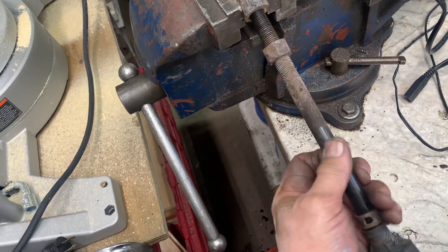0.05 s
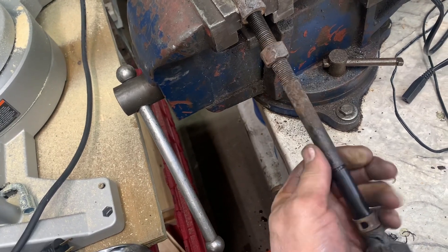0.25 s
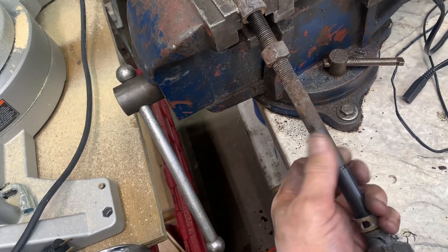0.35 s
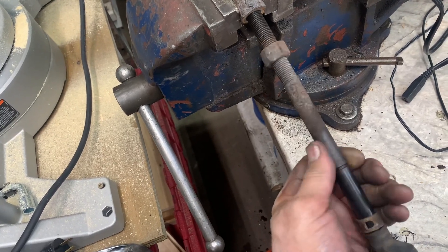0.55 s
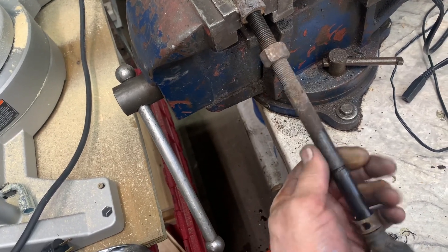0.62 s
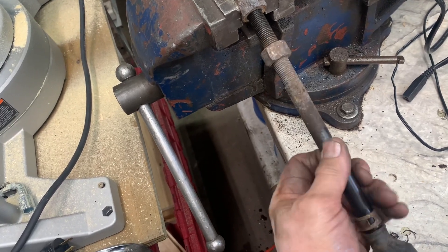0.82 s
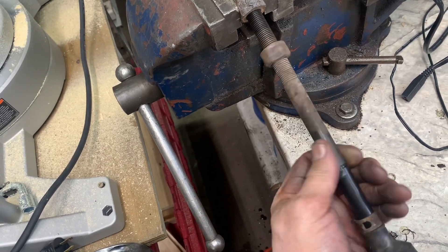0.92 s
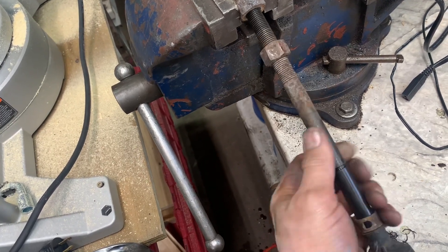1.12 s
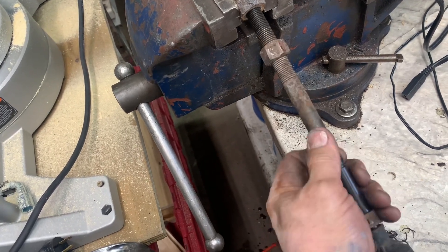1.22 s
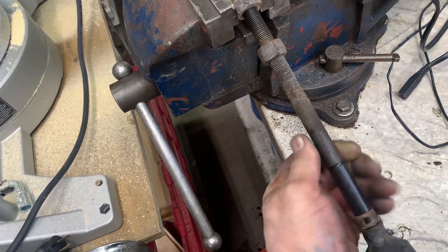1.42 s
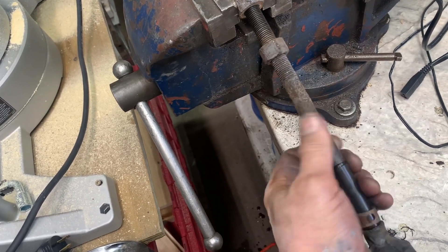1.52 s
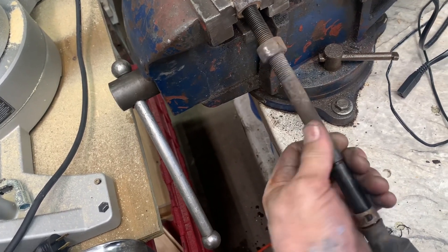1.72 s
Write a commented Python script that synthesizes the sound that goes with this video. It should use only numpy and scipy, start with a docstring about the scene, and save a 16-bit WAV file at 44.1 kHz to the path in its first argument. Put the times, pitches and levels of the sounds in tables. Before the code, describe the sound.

Metal threads rasp and clink softly as a rod is turned by hand at a vice.

```python
"""Over the low rumble of a small workshop, a threaded steel rod is turned by hand through a nut at a
vice, close by, in four twists. First the threads rasp by stick-slip friction, the bench thumps softly
and the fingers slide hissing along the shaft. As the slack in the thread is taken up, impacts excite
normal modes: the rod clinks until the grip damps it, then knocks in the vice, and grit ticks in the
thread. These sounds recur with the later twists, each followed by a short reverberation."""
import sys
import numpy as np
from scipy import signal
from scipy.fft import rfft, irfft
from scipy.io import wavfile
from scipy.ndimage import uniform_filter1d, map_coordinates

SR = 44100
rng = np.random.default_rng(int(sys.argv[2]) if len(sys.argv) > 2 else 0)


def int16_out(signal):
    """Quantize to a 16-bit WAV file."""
    q = np.round(np.clip(np.atleast_2d(signal).T, -1, 1) * 32767)
    wavfile.write(sys.argv[1], SR, q.astype(np.int16))


N = 77175


def undb(db):
    """Amplitude ratio: a factor of ten per 20 dB."""
    return 10 ** (np.asarray(db) / 20)


def unit(x):
    """Normalisation to rms 1."""
    return x / np.sqrt(np.mean(x ** 2))


def noise():
    """Gaussian white noise."""
    return rng.standard_normal(N)


def colour(x, spectrum):
    """Spectral shaping by (f/Hz, level/dB) points, to rms 1."""
    hz, db = np.array(spectrum, float).T
    f = np.fft.rfftfreq(N, 1 / SR) + 1
    gain = undb(np.interp(np.log(f), np.log(hz), db))
    return unit(irfft(rfft(x) * gain, N))


def flicker(rate_hz):
    """Moving averages smooth noise into a slow fluctuation of rms 1."""
    width = max(int(SR / rate_hz), 2)
    return unit(uniform_filter1d(uniform_filter1d(noise(), width), width))


def since(start):
    """Seconds since start, zero before it."""
    return np.maximum(np.arange(N) / SR - start, 0)


def ring(age, modes, scale=1):
    """Free vibration: a superposition of exponentially damped modes."""
    return sum(undb(db) * np.sin(2 * np.pi * f * scale * age) * np.exp(-np.log(1000) * age / t60)
               for f, db, t60 in modes)


def impacts(rows, modes, rise_s):
    """Impact excitation: the softer the contact, the slower the modes build up."""
    return -sum(undb(db) * (1 - np.exp(-since(start) / rise_s)) * ring(since(start), modes, hz)
                for start, db, hz in rows)


def swells(rows):
    """Lopsided Gaussian swells add in power; one envelope per level column."""
    t = np.arange(N) / SR
    power = 0
    for peak, rise, fall, *levels in rows:
        width = np.where(t < peak, rise, fall)
        power = power + undb(levels)[:, None] ** 2 * np.exp(-2 * ((t - peak) / width) ** 2)
    return np.sqrt(power)


# source positions: left delay/ms, left minus right/dB, reverberation/dB
HAND, NUT, ROD = (0.2957, -0.55, -5), (0.035, -1.2, -7.5), (0.015, -3, -17.5)
VICE, BENCH = (0.44, -2.5, -9), (1, -1.9, -29.5)
# reverberation spectrum: f/Hz, level/dB
REVERB_SPECTRUM = [(60, 4.5), (300, 3), (700, 7), (2000, -0.5), (3300, 2), (6000, 0.5), (9000, -7.5),
                   (11500, -25), (16000, -22)]
def place(x, position, gap_s=0.0021, t60_s=0.18):
    """Interaural time and level differences give direction; a diffuse decay gives the room."""
    lag_ms, pan_db, room_db = position
    left = map_coordinates(x, [np.arange(N) - lag_ms * SR / 1000], order=5, mode="nearest")
    age = since(gap_s)
    decay = (age > 0) * np.exp(-np.log(1000) * age / t60_s)
    tails = np.array([colour(noise(), REVERB_SPECTRUM) for _ in range(2)]) * decay
    wet = signal.fftconvolve(x[None], tails / np.sqrt(np.sum(tails ** 2) / 2), axes=1)[:, :N]
    balance = undb([[pan_db / 2], [-pan_db / 2]])
    return (np.array([left, x]) + undb(room_db) * wet) * balance


# background spectra: f/Hz, level/dB
RUMBLE = [(15, -72), (35, -2), (52, -6), (68, -3), (95, -17), (160, -22), (400, -34.5), (2000, -65)]
AIR = [(60, -13), (200, -18), (400, -12.5), (700, -8), (2000, -13), (3200, -19.5), (8000, -21),
       (16000, -18.5)]
def workshop():
    """Stationary noise: a low rumble, and faint air uncorrelated between the ears."""
    rumble = undb(-59.5) * colour(noise(), RUMBLE)
    air = undb(-77) * np.array([colour(noise(), AIR) for _ in range(2)])
    return place(rumble, BENCH) + air


# main and upper modes of the rod: f/Hz, level/dB, T60/s
ROD_MODES = [(4642, -5.5, 0.068), (4832, -20, 0.084), (4599, -11, 0.065), (5190, -26, 0.054),
             (4640, -13, 0.091), (3380, -24, .06)]
ROD_UPPER_MODES = [(6620, -11, 0.049), (6380, -18.5, .04), (7470, -31, 0.011), (8070, -19.5, 0.063)]
def rod_response(age, upper_db=0):
    """The rod's impulse response is the sum of its normal modes."""
    return ring(age, ROD_MODES) + undb(upper_db) * ring(age, ROD_UPPER_MODES)


# swells of friction within the twists: peak t/s, rise/s, fall/s, rasp/dB, grumble/dB, nut note/dB
THREAD_SWELLS = [(.175, 0.055, 0.073, -57, -64, -72), (.09, 0.054, 0.033, -78, -80, -81.5),
                 (.245, 0.015, 0.074, -60.5, -54, -69), (.40, .07, 0.047, -85, -65, -81.5),
                 (.495, 0.048, 0.053, -58, -59.5, -67), (.632, 0.059, 0.048, -64.5, -57, -83),
                 (.848, 0.02, .02, -65, -66.5, -69), (.968, 0.094, 0.039, -64.5, -63.5, -74),
                 (1.05, 0.037, 0.037, -80, -68.5, -91), (1.18, 0.041, 0.15, -74, -82.5, -102),
                 (1.262, 0.0088, 0.062, -65, -66, -81), (1.375, 0.05, 0.052, -52.5, -59.5, -71.5),
                 (1.51, 0.045, 0.054, -65, -62.5, -90), (1.68, 0.065, 0.059, -67.5, -71, -84)]
# spectra of the rasp, its low grumble and the nut's note: f/Hz, level/dB
RASP_SPECTRUM = [(300, -4), (600, -2.5), (1000, 4), (1400, 6), (2100, 4), (2800, -5), (4200, -4),
                 (5500, -2), (8000, -6.5), (15000, 0)]
GRUMBLE_SPECTRUM = [(100, -25), (200, -9), (300, -0.5), (410, 1.5), (510, -6), (610, -11.5), (760, -23.5),
                    (1500, -24), (4000, -49)]
NUT_SPECTRUM = [(1000, -41), (1700, -22), (1950, 11), (2300, 5), (2600, -5), (4000, -48)]
def thread_rasp(slips_per_s=2700, spread_db=1, jerk_db=3, ring_db=-11.5):
    """Stick-slip friction: random slips of the flanks rasp, ring the rod and grumble in the vice."""
    slips = (rng.random(N) < slips_per_s / SR) * np.sign(noise())
    strength = undb(spread_db * np.minimum(rng.exponential(size=N), 5))
    slips = unit(slips * strength * undb(jerk_db * flicker(rate_hz=58)))
    effort, grumble_level, note_level = swells(THREAD_SWELLS)
    steel = rod_response(since(0))
    ringing = signal.fftconvolve(slips * effort, steel / np.sqrt(np.sum(steel ** 2)))[:N]
    rasp = colour(slips, RASP_SPECTRUM) * effort
    note = colour(slips, NUT_SPECTRUM) * note_level
    grumble = colour(slips, GRUMBLE_SPECTRUM) * grumble_level
    return place(rasp + note + undb(ring_db) * ringing, NUT) + place(grumble, VICE)


# thumps of the bench: t/s, level/dB, f/Hz
BENCH_THUMPS = [(.095, -64, 54.3), (.233, -33.5, 62.7), (.2485, -33, 63.5), (.2835, -17.5, 59.5),
                (.315, -46, 149), (.348, -27, 71.3), (.543, -34.5, 61), (.61, -41, 55.6), (.649, -22, 66),
                (.706, -29, 67.2), (.80, -42.5, 67), (.888, -42, 67), (1.07, -39.5, 63.2),
                (1.30, -35.5, 57.4), (1.40, -35.5, 115.3), (1.427, -27, 57.1), (1.486, -36, 60.3),
                (1.56, -41, 61.7), (1.712, -38.5, 69)]
# their modes: frequency ratio, level/dB, T60/s
BENCH_MODES = [(0.999, 4, 0.12), (1.35, -19.5, 0.3)]
def bench_thumps():
    """Soft contact builds up the low modes of the bench gradually."""
    return place(impacts(BENCH_THUMPS, BENCH_MODES, rise_s=0.018), BENCH)


# slides of the fingers: peak t/s, rise/s, fall/s, hiss/dB, sizzle/dB
FINGER_SLIDES = [(.127, 0.021, 0.043, -70.5, -55), (.2, 0.036, 0.046, -55.5, -57),
                 (.283, 0.012, 0.012, -59, -63), (.505, 0.045, 0.037, -55, -56.5),
                 (.615, 0.031, 0.025, -59, -62), (.922, 0.026, 0.019, -90, -51.5),
                 (.963, 0.055, 0.033, -62.5, -69), (1.045, .014, 0.021, -85, -70),
                 (1.265, 0.017, 0.0099, -67.5, -93), (1.375, 0.051, 0.047, -52.5, -56.5),
                 (1.49, 0.026, 0.035, -62.5, -97), (1.545, 0.0072, 0.072, -67.5, -105),
                 (1.685, 0.026, 0.044, -69.5, -101)]
# spectra of the skin's hiss and its high sizzle: f/Hz, level/dB
HISS_SPECTRUM = [(500, -40), (1500, -8), (3000, 1), (4500, 9.5), (6000, -0.5), (8500, 10.5), (10500, 4),
                 (16000, 2.5)]
SIZZLE_SPECTRUM = [(2000, -45), (7000, -22), (10000, -10), (11500, -3), (12400, 1.5), (13300, -1),
                   (14200, 2), (16000, -1)]
def finger_hiss(flutter_db=2.1, drift_db=1.0):
    """Sliding friction of dry skin on the shaft gives broadband noise of fluctuating level."""
    rub = noise() * undb(flutter_db * flicker(rate_hz=140) + drift_db * flicker(rate_hz=32))
    hiss_level, sizzle_level = swells(FINGER_SLIDES)
    hiss = colour(rub, HISS_SPECTRUM) * hiss_level
    sizzle = colour(rub, SIZZLE_SPECTRUM) * sizzle_level
    return place(hiss + sizzle, HAND)


# clinks as slack is taken up: t/s, level/dB, relative upper modes/dB, crack/dB, time until damped/s
ROD_CLINKS = [(0.1165, -51.5, 4.5, -66, 0.02), (0.2683, -34, -4.5, -32, 0.0096),
              (0.2822, -66, -6, -47, 0.055), (0.295, -71, 11, -58, 0.071), (0.5035, -44, 9.5, -69, 0.01),
              (0.6642, -48, -29, -52, .08), (0.985, -56.5, -13, -66, .004), (1.153, -71.5, -13, -80, 0.025),
              (1.411, -35, -5, -41, .08)]
# spectrum of the contact crack: f/Hz, level/dB
CRACK_SPECTRUM = [(1000, -20), (3000, -10), (5500, -5), (7300, 11.5), (9000, -6), (10500, 6), (13000, -26),
                  (16000, 1.5)]
def rod_clinks(rise_s=0.0002, crack_s=0.0011, grip_s=0.0025, grip_floor_db=-29):
    """Hard impact of steel on steel cracks and excites high modes, which the grip then damps."""
    clinks = 0
    for start, db, upper_db, crack_db, free_s in ROD_CLINKS:
        age = since(start)
        damping = np.maximum(np.exp(-since(start + free_s) / grip_s), undb(grip_floor_db))
        steel = undb(db) * damping * rod_response(age, upper_db)
        crack = undb(crack_db) * colour(noise(), CRACK_SPECTRUM) * np.exp(-age / crack_s)
        clinks = clinks + (steel + crack) * (1 - np.exp(-age / rise_s))
    return place(clinks, ROD)


# knocks of the rod in the vice: t/s, level/dB, f/Hz
VICE_KNOCKS = [(.2215, -33.5, 422), (.259, -37, 334), (.481, -40.5, 317), (.535, -48.5, 425),
               (.626, -44.5, 390), (.631, -50.5, 652), (.912, -53.5, 600), (1.3865, -29.5, 355.3),
               (1.399, -34, 417), (1.42, -41, 293), (1.709, -48.5, 377)]
# their modes: frequency ratio, level/dB, T60/s
KNOCK_MODES = [(0.999, 1, 0.048), (1.254, -10, 0.047), (0.845, -18.5, 0.072), (1.67, -13.5, 0.038)]
def vice_knocks():
    """Backlash lets the rod strike in the vice, exciting hollow, inharmonic modes."""
    return place(impacts(VICE_KNOCKS, KNOCK_MODES, rise_s=0.003), VICE)


# ticks of grit in the thread: t/s, level/dB, f/Hz
GRIT_TICKS = [(.2455, -44, 2370), (.275, -43.5, 1150), (.301, -45.5, 1280), (.484, -45, 2130),
              (.533, -48.5, 1550), (.5355, -41, 740), (.630, -45.5, 1080), (.664, -45.5, 1950),
              (.8395, -70, 2250), (.977, -42.5, 1730), (1.251, -54, 2220), (1.345, -39, 2070),
              (1.3848, -36, 2270), (1.418, -40, 1120), (1.591, -56.5, 3620), (1.617, -59, 3650),
              (1.657, -61, 1920), (1.673, -52, 2120)]
# their modes: frequency ratio, level/dB, T60/s
TICK_MODES = [(0.914, 0.5, 0.0089), (0.668, -3, 0.0064), (1.42, -31, 0.017)]
def grit_ticks():
    """Brief contacts with grit excite heavily damped modes, heard as dry ticks."""
    return place(impacts(GRIT_TICKS, TICK_MODES, rise_s=0.0005), NUT)


def scene():
    """Linear superposition: the pressures of all sources add."""
    return (workshop() + thread_rasp() + bench_thumps() + finger_hiss()
            + rod_clinks() + vice_knocks() + grit_ticks())


def record(dry, low_cut_hz=22, soften_hz=14900, top_hz=15750):
    """Band limiting: filters thin the deepest bass, soften the highest treble and cut the top."""
    thinned = signal.sosfilt(signal.butter(2, low_cut_hz, "highpass", fs=SR, output="sos"), dry)
    soft = signal.sosfilt(signal.butter(6, soften_hz, fs=SR, output="sos"), thinned)
    return signal.sosfilt(signal.ellip(10, .2, 70, top_hz, fs=SR, output="sos"), soft)


dry = scene()
out = record(dry)
int16_out(out)
```